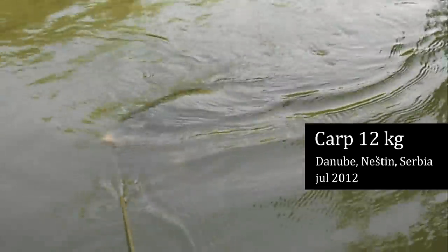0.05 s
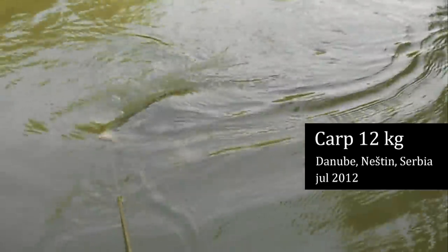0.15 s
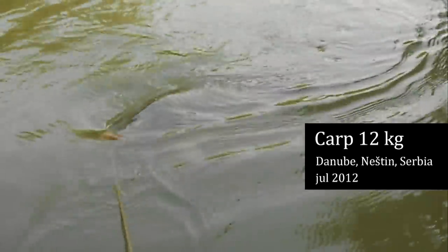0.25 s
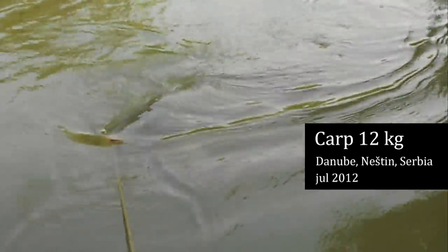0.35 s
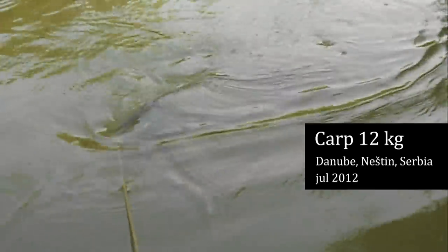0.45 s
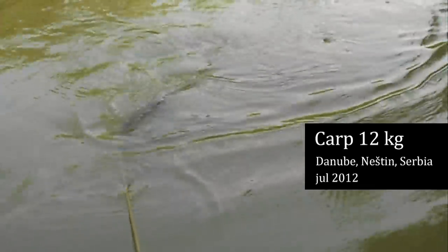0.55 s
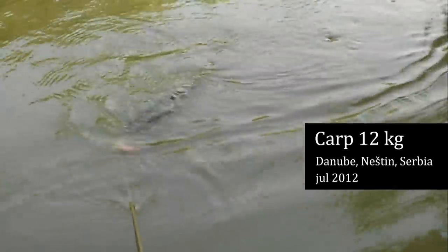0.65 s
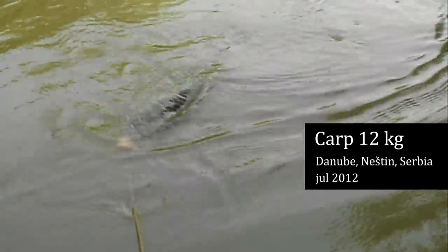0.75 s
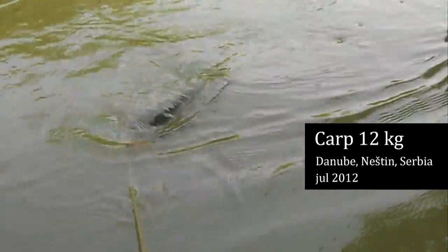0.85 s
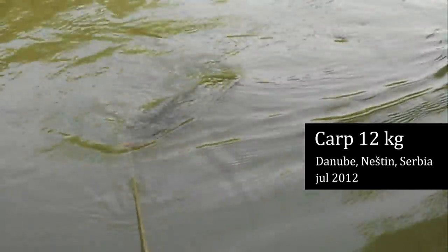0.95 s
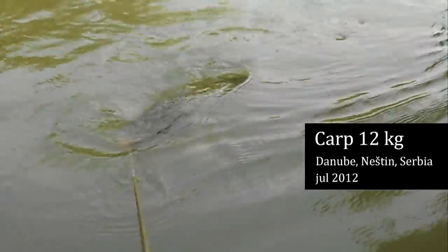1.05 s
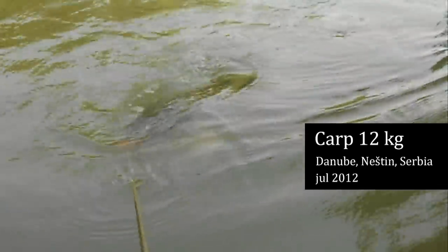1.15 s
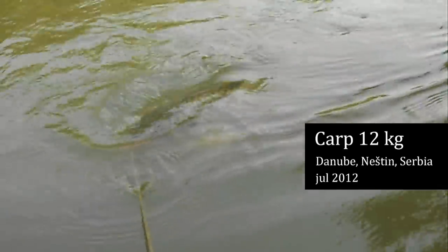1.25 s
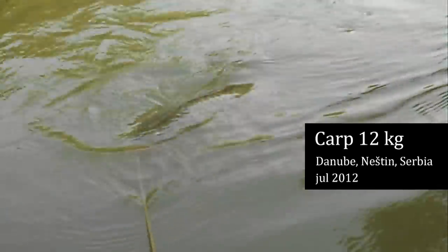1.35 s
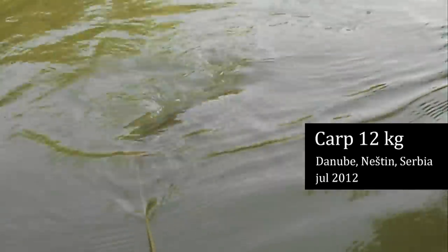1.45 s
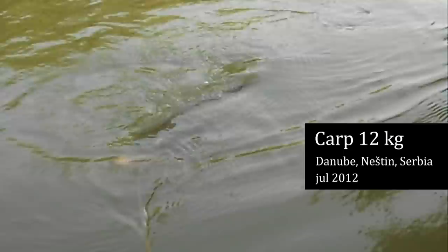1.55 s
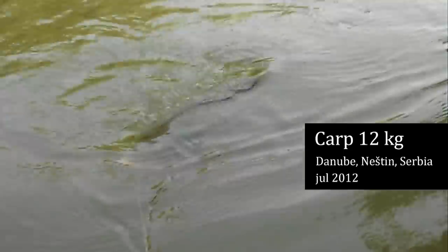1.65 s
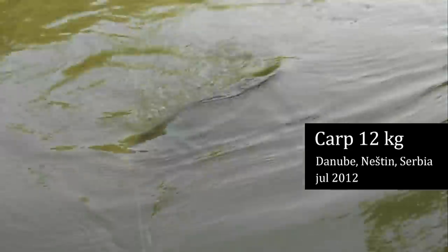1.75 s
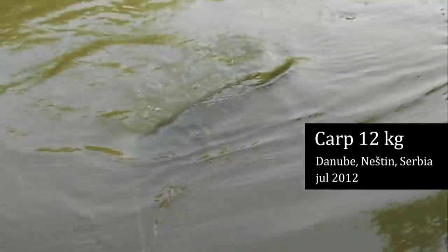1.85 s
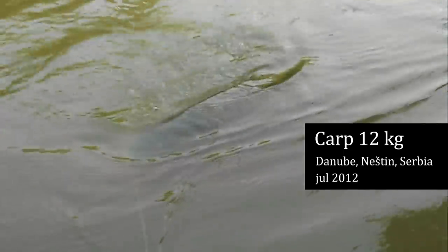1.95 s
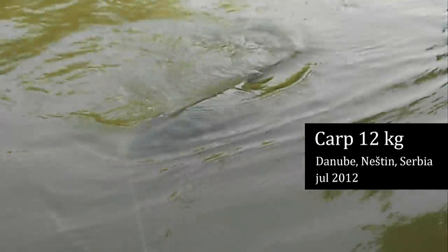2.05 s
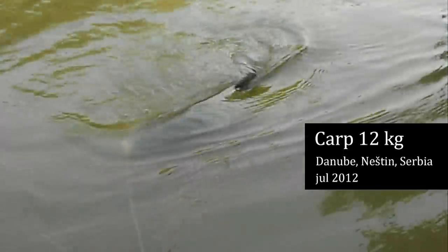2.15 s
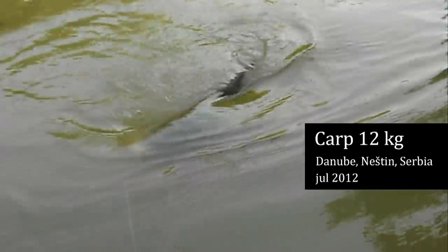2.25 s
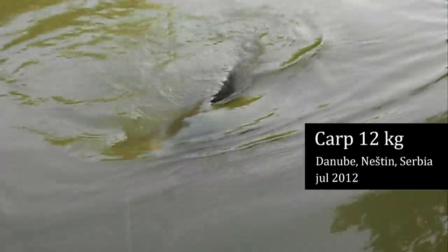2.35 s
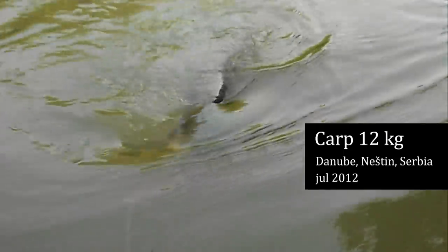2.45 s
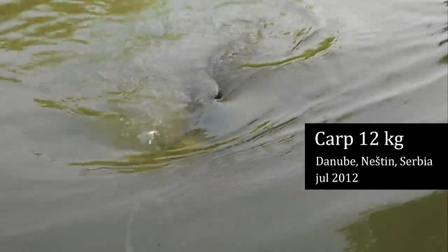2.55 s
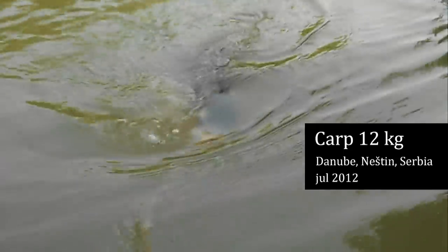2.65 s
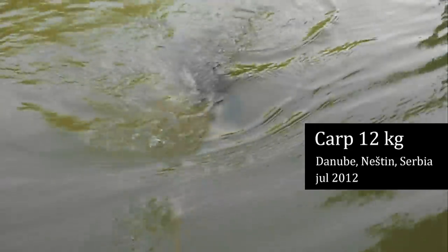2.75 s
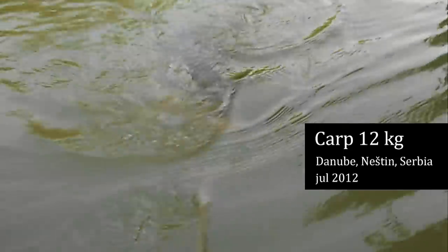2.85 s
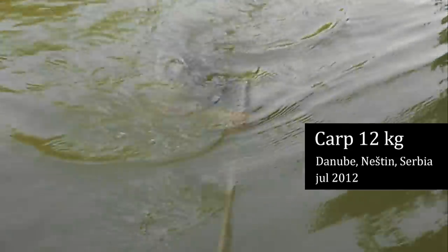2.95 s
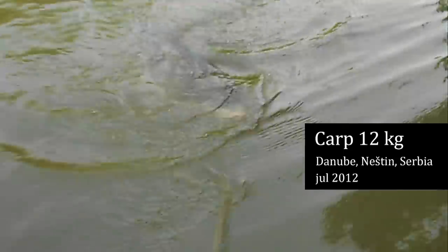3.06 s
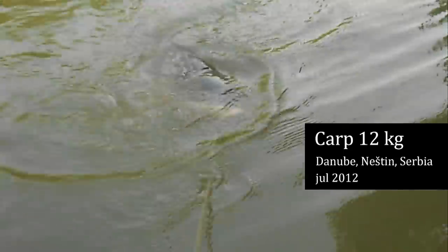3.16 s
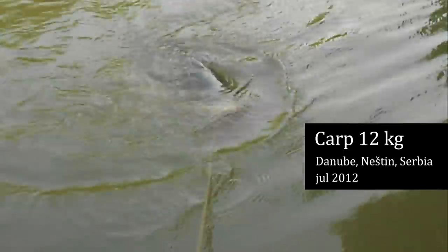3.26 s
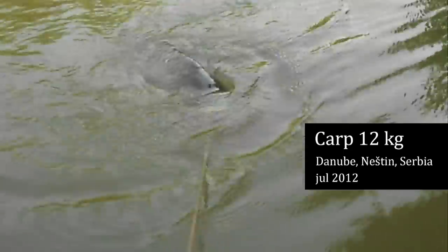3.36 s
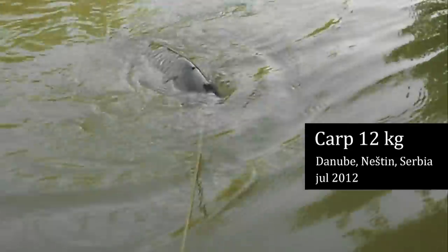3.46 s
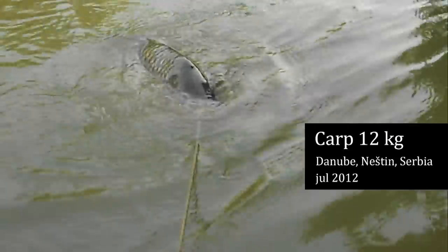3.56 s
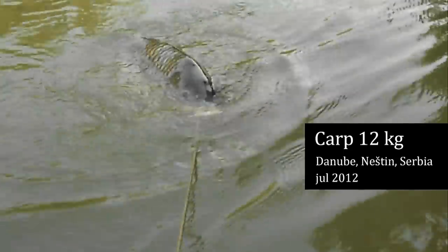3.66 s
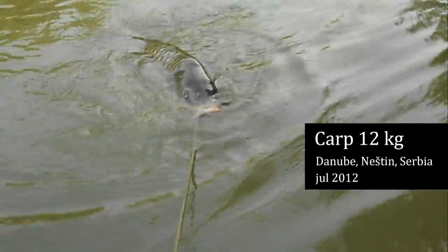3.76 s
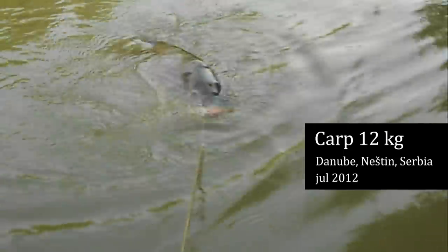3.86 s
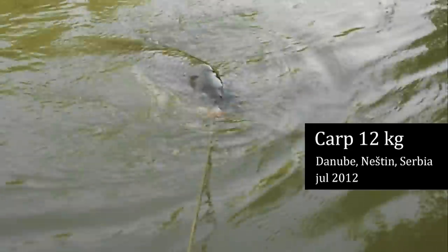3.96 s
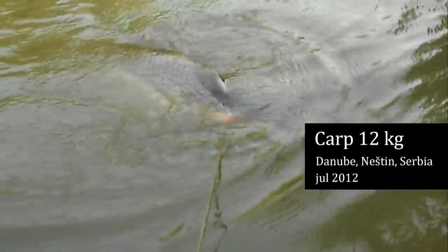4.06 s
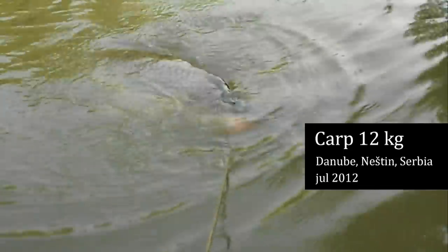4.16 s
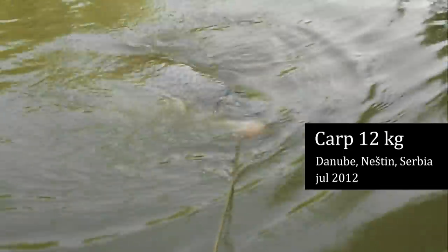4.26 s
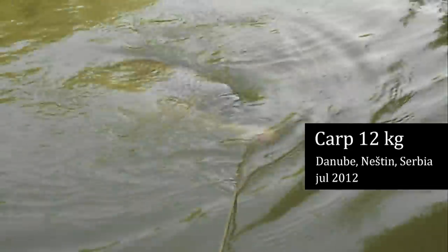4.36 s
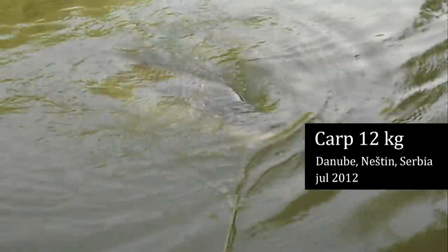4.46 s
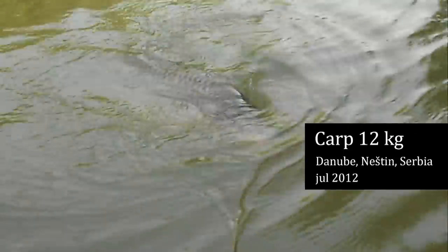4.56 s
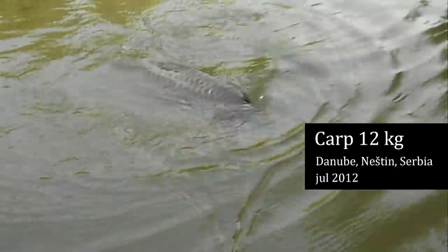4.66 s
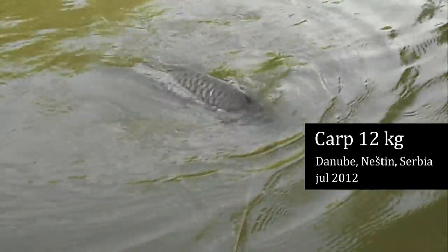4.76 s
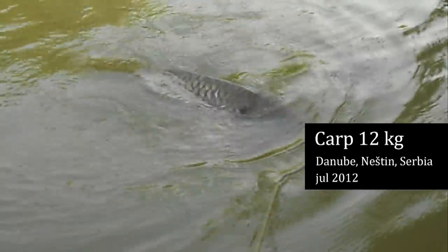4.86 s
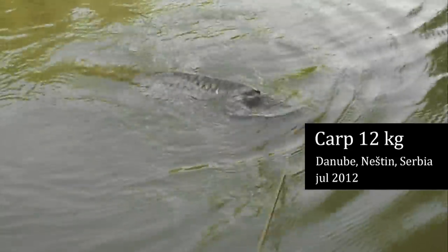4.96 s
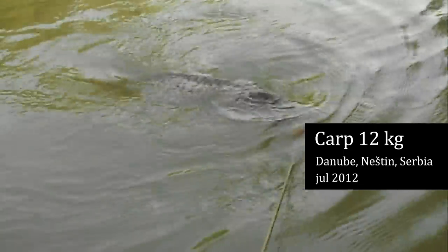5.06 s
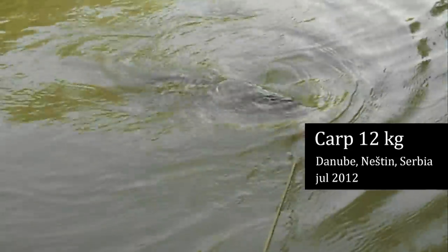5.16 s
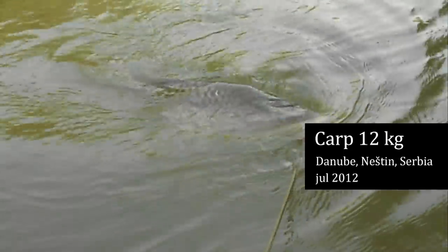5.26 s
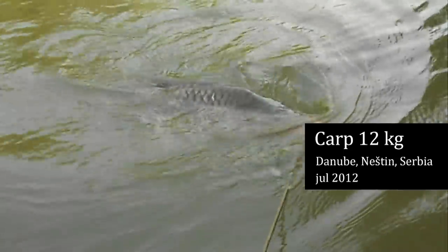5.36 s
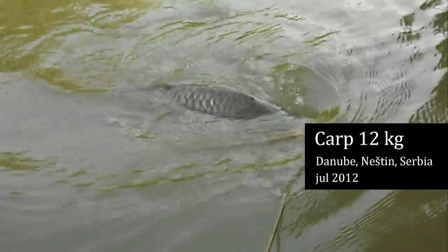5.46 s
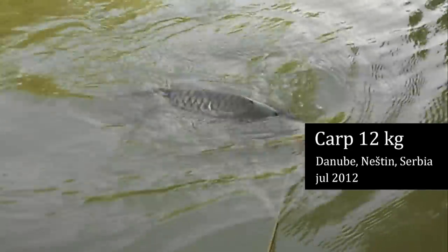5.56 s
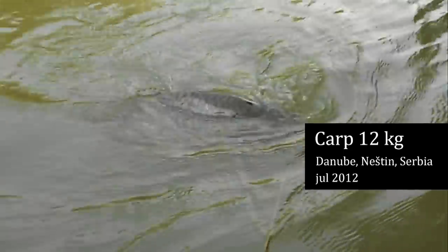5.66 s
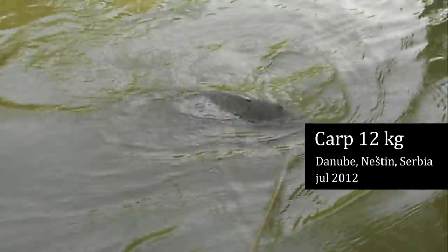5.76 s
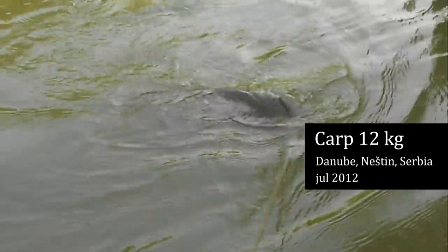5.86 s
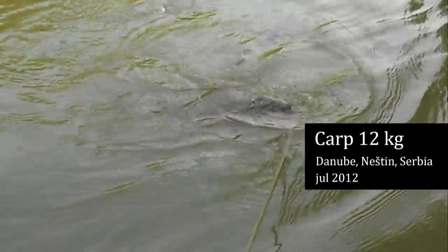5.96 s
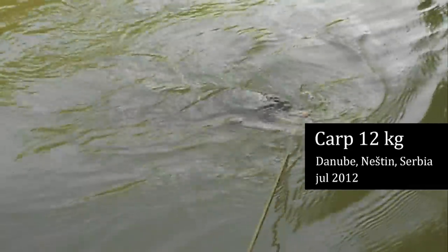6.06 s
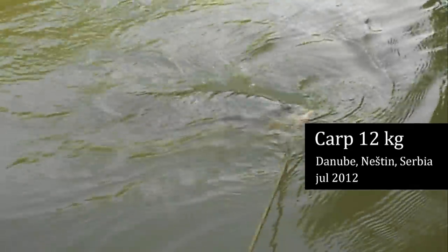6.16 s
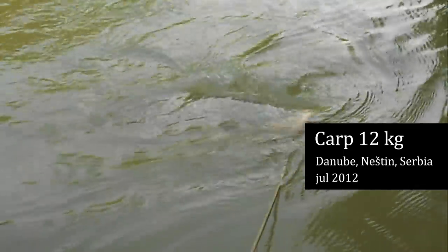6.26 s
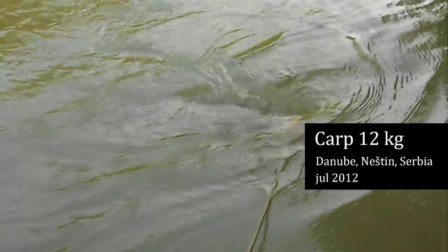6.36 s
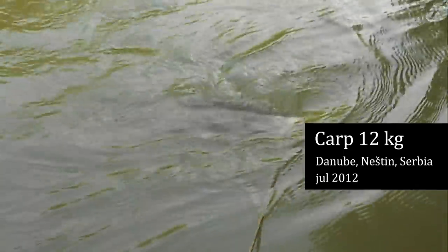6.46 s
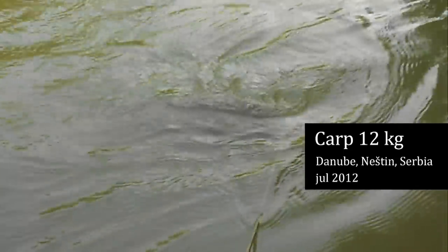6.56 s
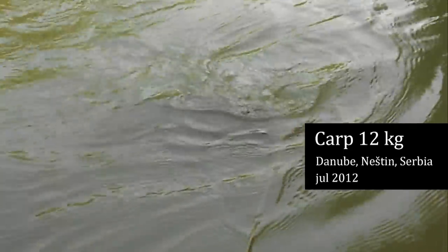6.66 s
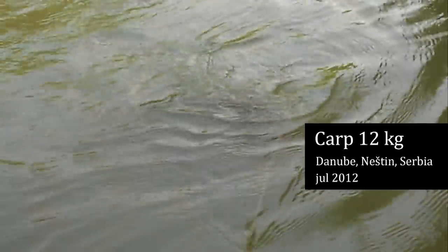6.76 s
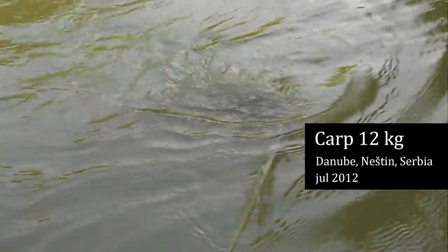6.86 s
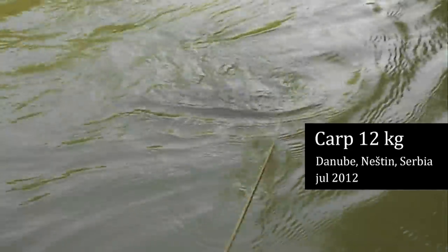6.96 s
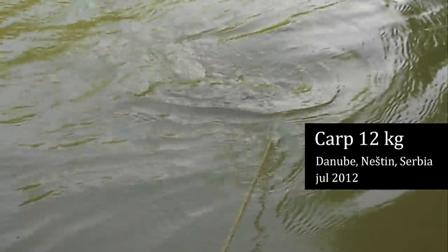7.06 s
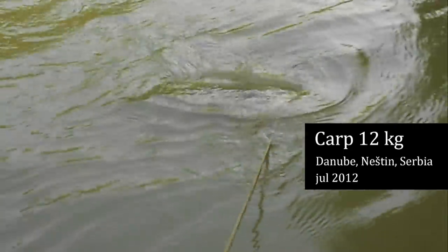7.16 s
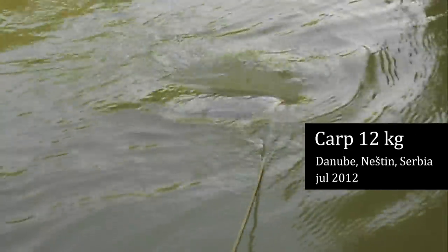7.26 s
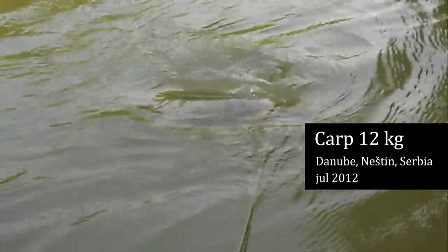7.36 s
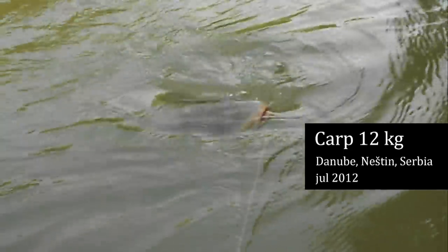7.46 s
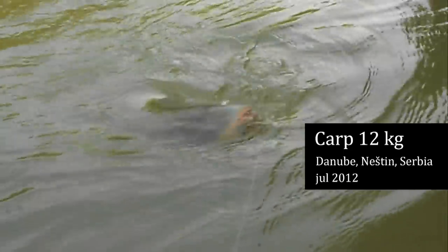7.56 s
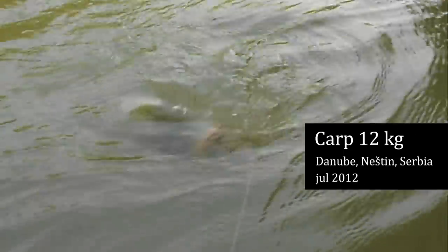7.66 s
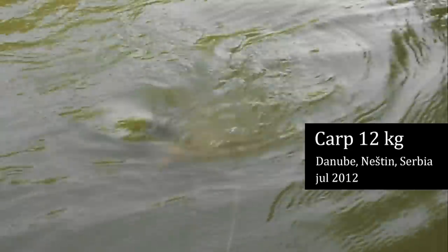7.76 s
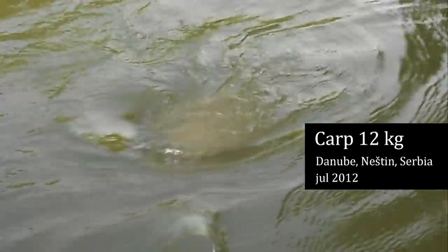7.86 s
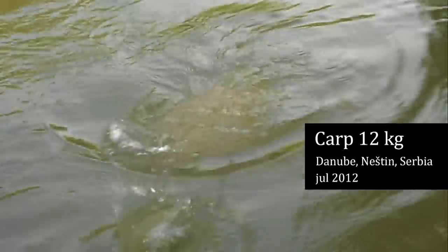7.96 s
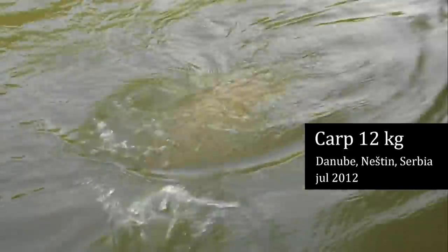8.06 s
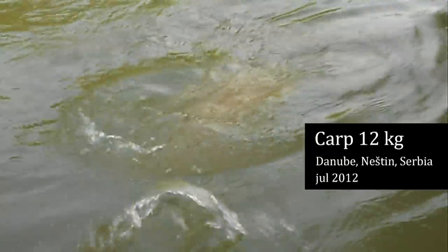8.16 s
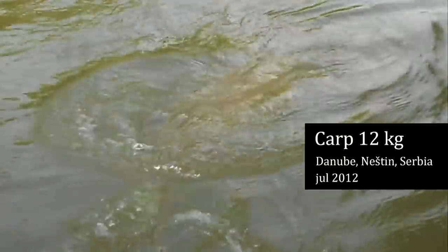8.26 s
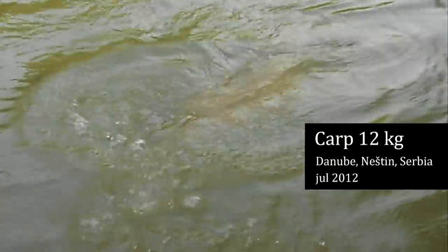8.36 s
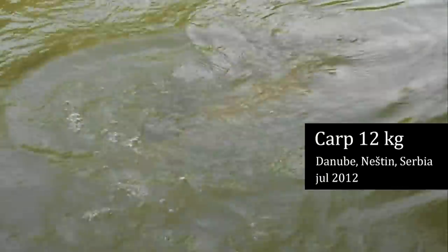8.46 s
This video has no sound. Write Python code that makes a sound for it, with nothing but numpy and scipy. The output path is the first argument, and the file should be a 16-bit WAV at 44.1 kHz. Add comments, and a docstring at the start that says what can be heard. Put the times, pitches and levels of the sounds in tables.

```python
"""A far bird sings over a steady watery rush with a low hum and a thin whine. A big carp on a line
swirls at the surface of a river while a bird on the bank repeats whistled phrases; at last the fish
slaps its tail and dives in a shower of drops. Air trapped by each stroke resonates as bubbles, whose
pitch climbs as they rise; drops tick on impact and sheets of water break into spray. The background
noise swells, then ducks sharply after the loud splash. A small camera microphone colours it all."""
import sys
import numpy as np
from scipy import signal
from scipy.fft import rfft, irfft, next_fast_len
from scipy.io import wavfile
from scipy.ndimage import map_coordinates

SR = 44100
rng = np.random.default_rng(int(sys.argv[2]) if len(sys.argv) > 2 else 0)


def wrap_up_sound(samples):
    """Save the sound to the file named by the first command line argument, as 16-bit audio."""
    columns = np.atleast_2d(samples).T
    # keep every value between -1 and 1, then stretch to whole-number steps
    tamed = np.clip(columns, -1, 1)
    steps = np.round(tamed * 32767).astype(np.int16)
    wavfile.write(sys.argv[1], SR, steps)


N = 374850

# large pockets of trapped air, and a few short, high rings where drops strike: t/s, level/dB, starting f/Hz,
# rise/(octaves/s), t60/s
AIR_POCKETS = [(1.4166, -41.5, 1510, 72, .018), (1.476, -38, 3250, 4, 0.004),
               (1.509, -46.5, 614, 6.5, 0.17), (1.619, -32.5, 822, 47, 0.057),
               (1.656, -42, 1036, 23, 0.094), (2.652, -53, 1470, 4, .1), (2.72, -48.5, 493, 6.3, 0.16),
               (2.787, -48, 685, 36, .086), (3.760, -44, 1190, 4, .012), (5.359, -35.5, 933, 4, .015),
               (5.602, -38.5, 650, 4, 0.056), (5.631, -36, 1120, 7.5, 0.055), (5.660, -36, 863, 10.5, .09),
               (5.726, -37.5, 850, 19, 0.035), (6.2664, -39, 1590, 8.3, 0.024),
               (6.28, -38.5, 1096, 4.4, 0.088), (6.318, -26.5, 690, 3, 0.039),
               (6.395, -32.5, 860, 38, .055), (7.552, -41, 890, 4, 0.047), (7.591, -39.5, 1360, 5.5, .042),
               (7.690, -37, 640, 4.9, .15), (7.7215, -35, 1010, 80, 0.018), (7.784, -18.5, 917, 29, .046),
               (7.900, -32, 1123, 27, .06), (7.934, -31.5, 536, 3.4, 0.087), (7.966, -29.5, 1126, 4, 0.052),
               (7.9918, -13.5, 3180, 4, 0.0033), (8.013, -25, 2360, 19, 0.011),
               (8.0615, -13.5, 748, 3.3, .024), (8.0599, -18, 1294, 65, .02), (8.076, -33, 774, 7.4, 0.12),
               (8.256, -24, 1070, 4, 0.0041), (8.274, -29, 762, 3.7, 0.046), (8.3949, -26, 1240, 48, 0.019),
               (8.403, -32, 1092, 4.2, 0.058)]
# fin strokes that churn up small bubbles: t/s, length/s, upper level/dB
FIN_STROKES = [(2.623, 0.21, -53.5), (4.881, .06, -50.5), (5.35, 0.077, -47.5), (5.6, 0.34, -41),
               (6.258, 0.17, -45), (7.552, 0.093, -47), (7.697, .2, -39), (7.898, 0.15, -33),
               (8.282, 0.17, -43.5)]
# sheets of water breaking up: t/s, spray level/dB, slosh level/dB, t60/s
WATER_SHEETS = [(1.62, -70, -58, 0.073), (1.659, -78, -54, 0.1), (3.758, -82, -57, 0.083),
                (3.882, -85, -57, 0.041), (6.268, -58, -50, .045), (7.575, -66, -60, 0.13),
                (7.708, -51, -44, 0.15), (7.874, -51.5, -45, 0.41), (7.991, -31.5, -46, 0.063),
                (8.012, -36, -32.5, 0.13), (8.058, -37, -26.5, 0.12), (8.076, -49, -49, 0.13),
                (8.272, -47, -39.5, 0.15), (8.319, -40, -45, 0.053), (8.377, -48, -46, 0.12),
                (8.396, -41, -31.5, .1)]
# drops hitting the surface: t/s, level/dB, relative level of the body/dB
DROP_IMPACTS = [(1.4667, -34.5, -4), (1.4736, -38.5, -7), (1.598, -32.5, -21), (2.485, -41.5, -14),
                (2.728, -37.5, -19), (4.8569, -44, -19), (5.353, -34, -9), (5.3845, -45, 5),
                (5.485, -34, -15), (5.8296, -25.5, -12), (5.985, -35, -29), (6.2667, -37.5, 6),
                (7.01, -37.5, -17), (7.0643, -37.5, -15), (7.097, -43, -29), (7.5186, -32.5, -13.5),
                (7.6172, -30.5, -25), (7.7243, -37, 1.5), (7.649, -34, -18), (7.9164, -26, -24),
                (7.98, -27, -11), (7.9962, -21, 1), (8.2417, -38, -8), (8.07, -13.5, -22),
                (8.1243, -29, -31), (8.3812, -26.5, -8), (8.4008, -27.5, -0.5)]
# spectra of bright spray and mid-range slosh: f/Hz, level/dB
SPRAY_SPECTRUM = [(1500, -45), (3200, -5), (6500, -2.5), (10000, 3), (14000, -4.5)]
SLOSH_SPECTRUM = [(300, -39), (750, 9.5), (1400, 2.5), (2200, -12), (3300, -6.5), (4800, -13), (8000, -26)]
# background rush with a low hum, watery wash, and hiss with a thin high whine: f/Hz, level/dB
RUSH_HUM_SPECTRUM = [(20, -17), (35, -7.5), (48, -4), (56, 5), (66, -2.5), (120, -2.5), (165, -4.5),
                     (230, 0.5), (320, -1), (430, -11.5), (700, -24), (1500, -69)]
WASH_SPECTRUM = [(200, -21.5), (420, -2), (650, 1), (1000, -5), (1500, -13), (2300, -19), (3500, -24.5),
                 (6000, -37.5), (12000, -61)]
HISS_WHINE_SPECTRUM = [(1500, -28), (4000, -6), (7000, -1.5), (7740, 0.5), (7870, 10), (8000, 2.5),
                       (10000, -0.5), (13300, -3), (13800, -25)]
# contours of the birds' syllables, by name: share of the length, frequency ratio, level/dB
SYLLABLE_SHAPES = { "note": [(0, .98, -8), (.35, 1, -3.5), (.7, 0.985, -1.5), (1, 0.975, -12)],
                   "chip": [(0, 1, -10), (.25, 0.98, 2), (.75, .92, -3), (1, 0.8, -16)],
                   "scoop": [(0, 1.25, -12), (.15, 1.08, 0), (.27, 1, -4.5), (.45, 1.11, -1),
                   (.7, 1.18, 1.5), (.88, 1.205, -2), (1, 1.21, -37)], "hook": [(0, 1.2, -7), (.1, 1, -1.5),
                   (.4, 1.05, 1), (.77, 1.09, -10), (1, 1.09, -10)], "arch": [(0, .82, -11),
                   (.12, 0.94, -4.5), (.3, 0.99, -4), (.52, 0.98, -1), (.7, .91, -4), (.89, .815, -3),
                   (1, 0.7, -18)], "sweep": [(0, .6, -3), (.45, .8, -19), (.72, 1, 3), (.9, 1.2, -3),
                   (1, 1.34, -19)], "slur": [(0, .93, -19), (.06, 0.94, -11.5), (.16, 1, -7),
                   (.3, 0.94, -3), (.54, .895, -0.5), (.84, .852, -1.5), (.94, .81, -0.5), (1, 0.51, -20)],
                   "whistle": [(0, .95, -12), (.08, .992, -5), (.2, 1.003, -1.5), (.52, 1.003, -4.5),
                   (.88, .998, -9), (1, .995, -10)]}
# the near bird's syllables: shape, first t/s, repeat period/s, length/s, f/Hz, drift per repeat/Hz,
# warble as a share of f, level of each repeat/dB
NEAR_SONG = [ ("chip", 2.29, 0.05, .05, 3330, -25, 0, [-58, -55]),
             ("chip", 2.452, .042, .057, 3250, -480, 0, [-53, -57]),
             ("scoop", 2.808, .544, .2, 3360, -38.5, 0.0088, [-56, -57.5]),
             ("hook", 3.072, .546, .13, 2700, -20.5, 0.0048, [-54.5, -53.5]),
             ("arch", 3.968, 0, .27, 3400, 0, .036, [-53.5]),
             ("sweep", 4.482, .273, .112, 2675, -21, .008, [-56, -55]),
             ("slur", 4.952, .555, .15, 3890, 15, 0, [-49, -41, -41]),
             ("whistle", 5.155, .566, 0.245, 2520, -27, 0, [-47.5, -42.5, -47])]
# the far bird's notes: t/s, f/Hz, level/dB
FAR_SONG = [(.04, 3670, -69), (0.089, 3050, -59.5), (.31, 2880, -64), (.48, 3170, -64), (.68, 4010, -59.5),
            (.82, 4600, -65), (.95, 3280, -60), (1.08, 3660, -62), (1.16, 2970, -68), (1.21, 2700, -69),
            (1.32, 3050, -60)]
# the whole background noise, swelling, then ducking sharply after the loud splash: t/s, level/dB
BACKGROUND_LEVELS = [(0, -49.5), (1.2, -51), (1.44, -50.5), (1.54, -45.5), (1.72, -42), (2.46, -49.5),
                     (3.1, -48), (3.9, -47.5), (4.45, -50), (5.02, -50), (5.12, -44), (5.38, -43.5),
                     (5.78, -37), (6.1, -40), (6.42, -37), (6.9, -44.5), (7.45, -48.5), (7.78, -39.5),
                     (7.985, -38.5), (8.02, -52.5), (8.2, -53), (8.3, -50), (8.5, -50)]
# the microphone's response, with two port notches: f/Hz, gain/dB
MIC_RESPONSE = [(3300, 0.5), (4000, -2), (5000, -12), (5500, -26.5), (6000, -13), (6700, -4), (8500, -3.5),
                (10000, 4), (10750, 1), (11020, -18), (11350, 0.5), (12000, 0), (13300, -13.5),
                (14300, -34)]


def bubble(hz, rise, t60, swell):
    """Damped resonance of trapped air; nearing the surface it climbs unevenly, by up to an octave."""
    t = seconds(t60 + swell)
    envelope = attack_decay(t, swell, t60)
    wobble = map_coordinates(rng.standard_normal(size=32), [t * 150], mode="reflect")
    pitch = hz * 2 ** (np.minimum(rise * t, 1) + 0.031 * wobble)
    return envelope / envelope.max() * np.sin(2 * np.pi * np.cumsum(pitch) / SR)


def gulps(cloud_db=-17, swell_share=0.046):
    """Air entrainment: fins and tail fold in pockets of air, each shedding smaller ones as it rings."""
    out = np.zeros(N)
    for s, db, hz, rise, t60 in AIR_POCKETS:
        add(out, s, amp(db) * bubble(hz, rise, t60, swell_share * t60))
        for delay, pitch, loudness in rng.random(size=(4, 3)):
            small = bubble(hz * 0.84 * 2 ** pitch, rise=6.8, t60=min(t60, .02), swell=0.00028)
            add(out, s + min(t60, .035) * delay, amp(min(db, -26) + cloud_db + 4.8 * loudness) * small)
    return out


def churn(count=18, low_hz=557, octaves=1.8, ring_cycles=33, high_db=-7, spread_db=13.5):
    """Resonance at constant Q: each stroke leaves a gurgle of bubbles, the higher shorter and fainter."""
    out = np.zeros(N)
    for s, length, db in FIN_STROKES:
        for k, (delay, pitch, faintness) in enumerate(rng.random((count, 3))):
            hz = low_hz * 2 ** (octaves * pitch)
            level = amp(db + high_db * pitch - spread_db * faintness)
            ring = bubble(hz, rise=12.6, t60=ring_cycles / hz, swell=0.0052)
            add(out, s + length * (k + delay) / count, level * ring)
    return out


def splashes(attack_s=0.00081):
    """Fragmentation: a sheet of water slaps down and scatters into ever fainter droplets."""
    spray, slosh = np.zeros((2, N))
    for s, spray_db, slosh_db, t60 in WATER_SHEETS:
        envelope = attack_decay(seconds(t60), attack_s, t60)
        add(spray, s, amp(spray_db) * envelope)
        add(slosh, s, amp(slosh_db) * envelope)
    flicker = map_coordinates(rng.standard_normal(3000), [np.arange(N) * 250 / SR], mode="reflect")
    spray *= patter(2500, 11.6, SPRAY_SPECTRUM)
    slosh *= patter(1500, 8.2, SLOSH_SPECTRUM)
    return amp(2 * flicker) * (spray + slosh)


def drops(attack_s=0.0003, t60=0.0062):
    """Impact excitation: each drop gives a sharp tick; heavier ones add a short, lower body."""
    out, t = np.zeros(N), seconds(.03)
    for s, db, body_db in DROP_IMPACTS:
        burst = rng.standard_normal(len(t)) * attack_decay(t, attack_s, t60)
        spectrum = [(1500, body_db - 13), (3400, body_db), (6500, -4), (10000, -1.7), (14000, -4)]
        tick = colour(burst / np.abs(burst).max(), spectrum)
        ping_detune, body_detune = np.exp(0.13 * rng.standard_normal(2))
        ping = bubble(9500 * ping_detune, rise=21, t60=0.0049, swell=0.00026)
        body = bubble(3200 * body_detune, rise=9.1, t60=0.0083, swell=0.0005)
        add(out, s, amp(db + 3) * tick)
        add(out, s, amp(db - 11) * ping)
        add(out, s, amp(db + body_db - 5.5) * body)
    return out


def shower(count=26, scatter_s=.13):
    """Bubble resonance: thrown drops fall back as rising plinks, louder after harder splashes."""
    out = np.zeros(N)
    for s, spray_db, _, _ in WATER_SHEETS:
        for delay, pitch, faintness in rng.random((count, 3)):
            hz = 1500 * 7.5 ** pitch
            plink = bubble(hz, rise=29, t60=24 / hz, swell=0.001)  # smaller bubbles die sooner
            add(out, s + scatter_s * delay ** 2, amp(-22.5 + 0.44 * spray_db - 30 * faintness) * plink)
    return out


def foam(attack_s=0.015, t60=0.49, relative_db=-19.5):
    """Exponential decay: the surface fizzes on after each splash, in proportion to its spray."""
    level = np.zeros(N)
    envelope = attack_decay(seconds(t60), attack_s, t60)
    for s, spray_db, _, _ in WATER_SHEETS:
        add(level, s, amp(spray_db + relative_db) * envelope)
    return level * patter(700, 6, SPRAY_SPECTRUM)


def syllable(shape, length, hz, warble, warble_hz=62, waver=0.0042, flutter_db=2.5):
    """Frequency and amplitude modulation: a pure whistle glides along a contour, wavering slightly."""
    share, ratio, shape_db = np.transpose(SYLLABLE_SHAPES[shape])
    t = seconds(length)
    unsteady = map_coordinates(rng.standard_normal(64), [t * 120], mode="reflect")
    flutter = map_coordinates(rng.standard_normal(64), [t * 120], mode="reflect")
    pitch = hz * np.interp(t / length, share, ratio)
    pitch *= 1 + waver * unsteady + warble * np.sin(2 * np.pi * warble_hz * t + 0.98 * flutter)
    level = amp(np.interp(t / length, share, shape_db) + flutter_db * flutter)
    return level * signal.windows.tukey(len(t), .1) * np.sin(2 * np.pi * np.cumsum(pitch) / SR)


def birds():
    """Direct-to-reverberant ratio: the bird on the bank is mostly direct, the far one mostly echo."""
    close, distant = np.zeros((2, N))
    for shape, first, period, length, hz, drift_hz, warble, levels_db in NEAR_SONG:
        for k, db in enumerate(levels_db):
            add(close, first + k * period, amp(db) * syllable(shape, length, hz + k * drift_hz, warble))
    for s, hz, db in FAR_SONG:
        add(distant, s, amp(db) * syllable("note", length=0.091, hz=hz, warble=0.01))
    bank = amp(-1.5) * close + amp(-7.5) * echo(close, t60=0.67, build_s=0.0012)
    return bank + amp(-6) * distant + amp(-4) * echo(distant, t60=0.48, build_s=0.0017)


def background(usual_db=-46, wash_growth=.85, hiss_growth=0.96):
    """Amplitude modulation: rush and hum, bubbly wash, hiss and whine all swell and duck together."""
    level_db = np.interp(np.arange(N) / SR, *np.transpose(BACKGROUND_LEVELS))
    swell_db = level_db - usual_db
    wash_gain = amp(-55.5 + wash_growth * swell_db)
    hiss_gain = amp(-70 + hiss_growth * swell_db)
    rush = amp(level_db - 1) * noise(RUSH_HUM_SPECTRUM)
    wash = noise(WASH_SPECTRUM)
    fizz = np.zeros(N)
    for when, pitch, faintness, life in rng.random((300, 4)):
        ring = bubble(650 * 3.5 ** pitch, rise=27, t60=0.0082 + 0.03 * life, swell=0.0006)
        add(fizz, when * N / SR, amp(-14 * faintness) * ring)
    prickle = amp(-5) * patter(60, 4.5, SPRAY_SPECTRUM)
    hiss = amp(2) * noise(HISS_WHINE_SPECTRUM)
    return rush + wash_gain * (wash + amp(-4) * fizz) + hiss_gain * (hiss + prickle)


def echo(x, t60, build_s):
    """Diffuse scattering from the bank and its trees: convolution with a decaying noise tail."""
    t = seconds(t60)
    tail = rng.standard_normal(len(t)) * attack_decay(t, build_s, t60)
    return signal.fftconvolve(x, tail / np.linalg.norm(tail))[:N]


def patter(per_second, spread_db, spectrum):
    """Shot noise: countless tiny impacts of uneven size, rms 1."""
    hits = (rng.random(N) < per_second / SR) * rng.choice([-1, 1], N)
    sizes = amp(spread_db * np.clip(rng.standard_normal(N), -2, 2))
    return unit(colour(hits * sizes, spectrum))


def noise(spectrum):
    """Filtered Gaussian noise, rms 1."""
    return unit(colour(rng.standard_normal(N), spectrum))


def colour(x, points):
    """Minimum-phase filter whose gain passes through points of f/Hz, gain/dB."""
    size = 2 * next_fast_len(len(x) // 2 + 4096)
    hz, db = np.transpose(points)
    gain = amp(np.interp(np.log(np.fft.rfftfreq(size, 1 / SR) + 1), np.log(hz), db))
    cepstrum = irfft(np.log(gain))
    cepstrum[1:size // 2] *= 2  # folding onto positive time makes the filter causal
    cepstrum[size // 2 + 1:] = 0
    return irfft(rfft(x, size) * np.exp(rfft(cepstrum)))[:len(x)]


def attack_decay(t, attack_s, t60):
    """Exponential onset times a damping of 60 dB in t60 seconds."""
    return (1 - np.exp(-t / attack_s)) * amp(-60 * t / t60)


def amp(db):
    """Decibels to amplitude ratio."""
    return 10 ** (np.asarray(db) / 20)


def unit(x):
    """Normalisation to rms 1."""
    return x / np.sqrt(np.mean(x ** 2) + 1e-20)


def add(track, s, sound):
    """Superposition of a sound on the track at time s."""
    part = track[max(round(s * SR), 0):][:len(sound)]
    part += sound[:len(part)]


def seconds(length):
    """A uniformly sampled time axis."""
    return np.arange(max(int(length * SR), 8)) / SR


def scene():
    """Superposition: the fish is close, the birds further off, the background noise underneath."""
    fish = gulps() + churn() + drops() + splashes() + foam() + shower()
    near = fish + amp(-12.5) * echo(fish, t60=0.1, build_s=0.0035)
    return (near + birds() + background())[None]


def record(dry, top_hz=14368):
    """Frequency response: the small microphone colours the treble and passes nothing above top_hz."""
    size = next_fast_len(N + 8192)
    passband = np.fft.rfftfreq(size, 1 / SR) < top_hz
    spectrum = rfft(colour(dry[0], MIC_RESPONSE), size) * passband
    return irfft(spectrum, size)[None, :N]


dry = scene()
out = record(dry)
wrap_up_sound(out)
```